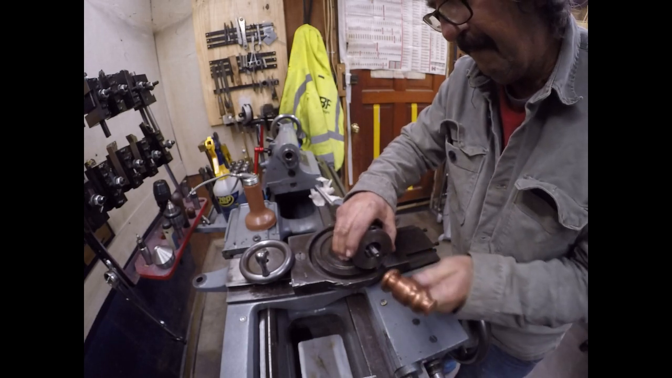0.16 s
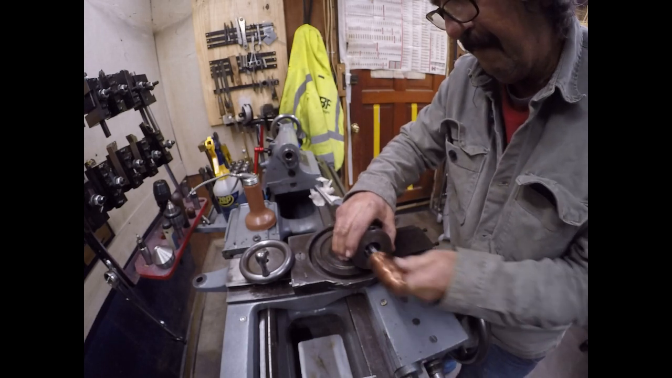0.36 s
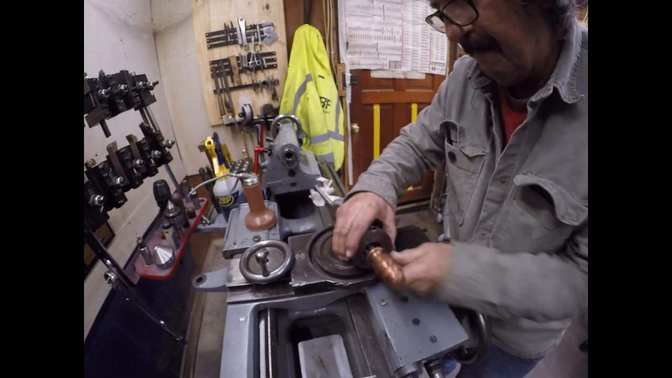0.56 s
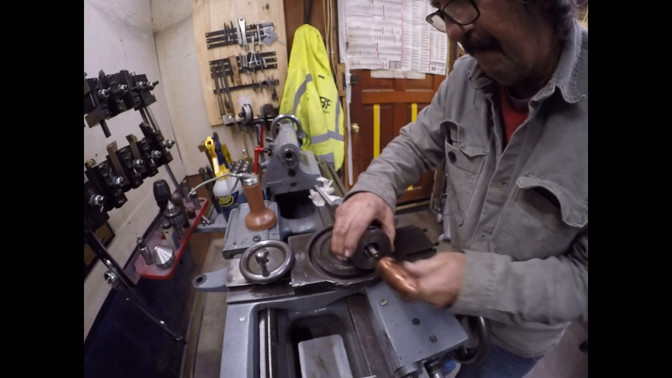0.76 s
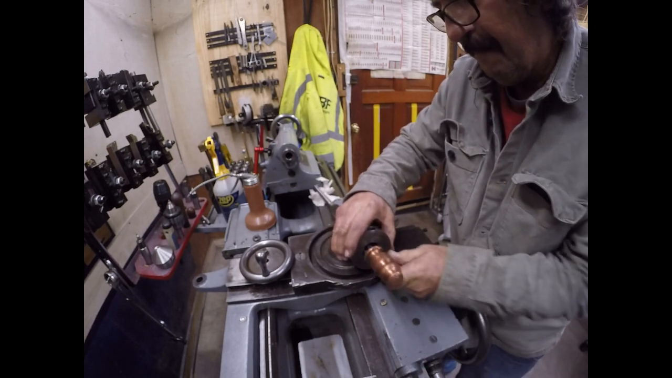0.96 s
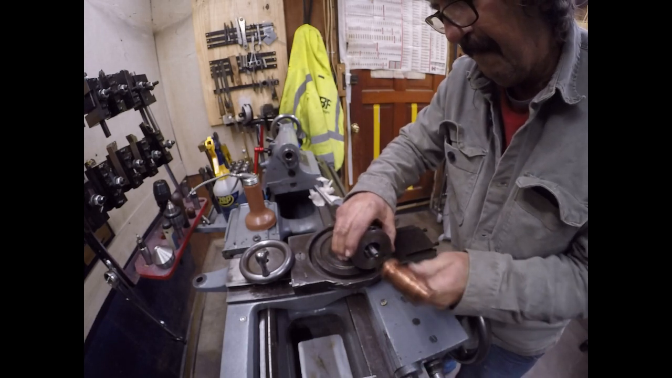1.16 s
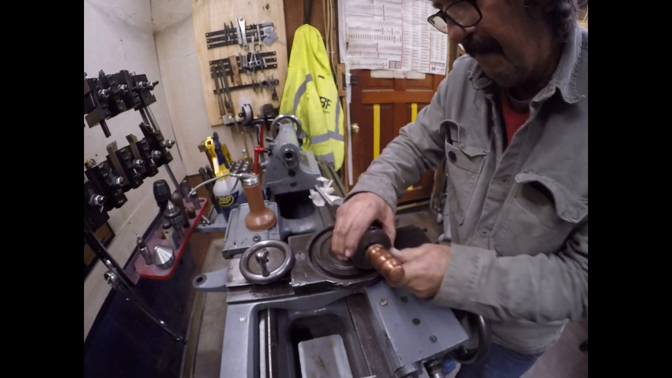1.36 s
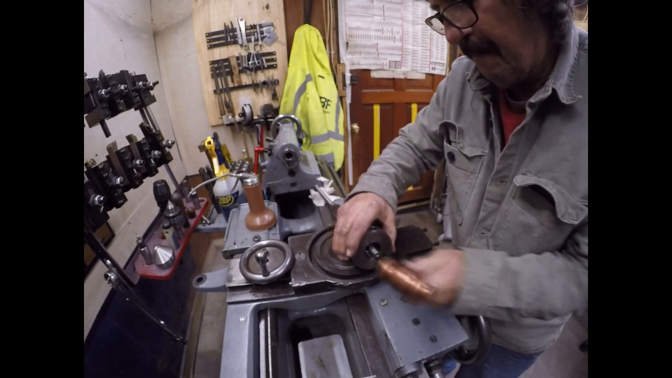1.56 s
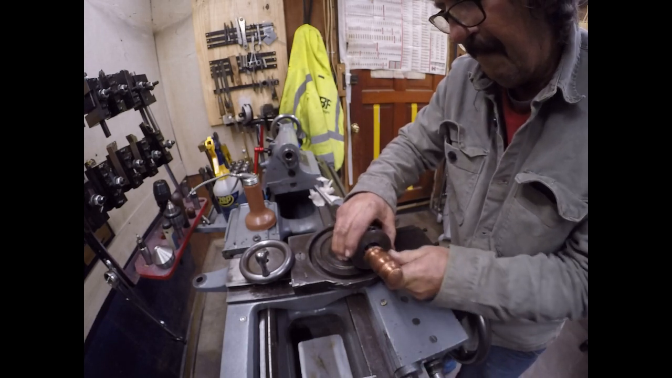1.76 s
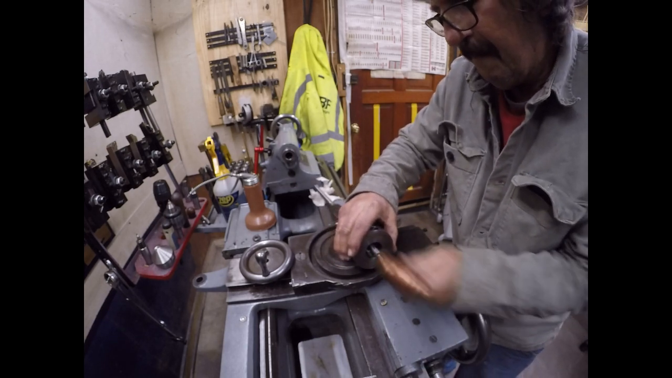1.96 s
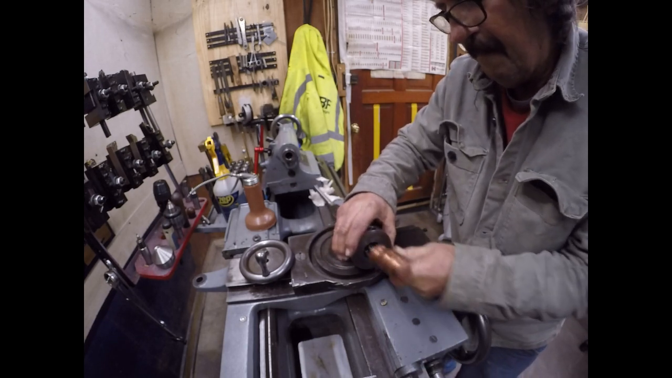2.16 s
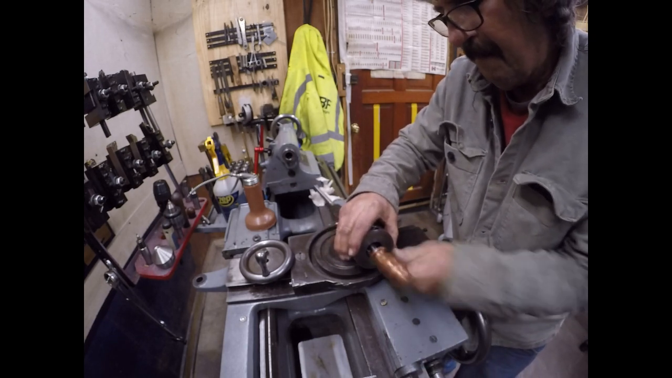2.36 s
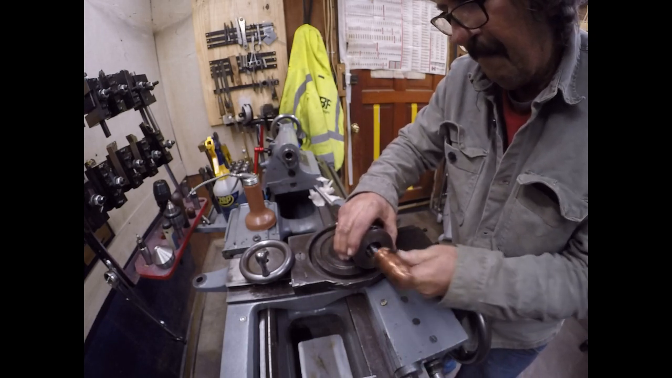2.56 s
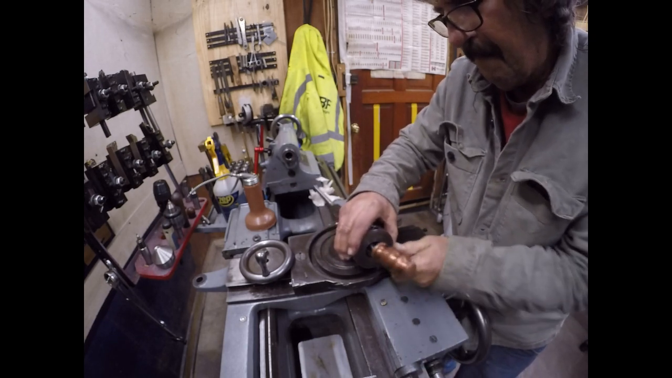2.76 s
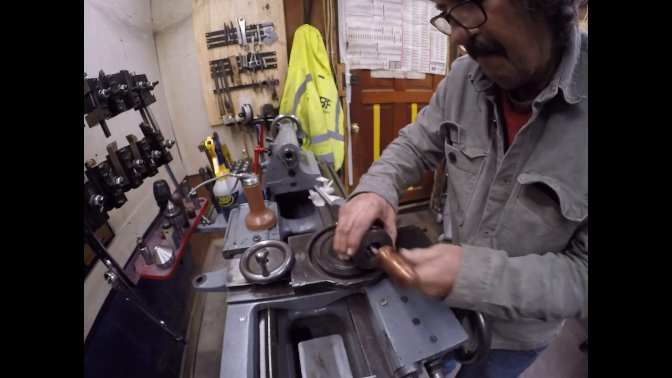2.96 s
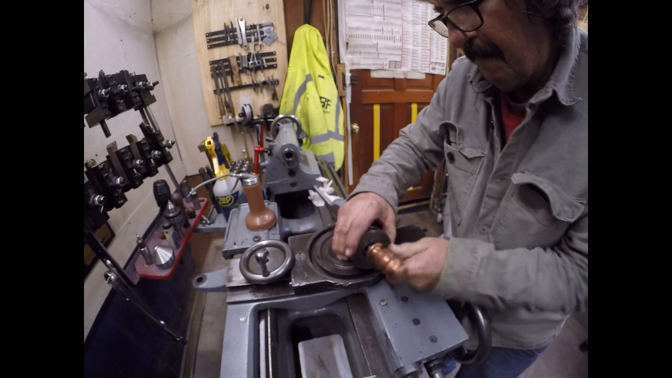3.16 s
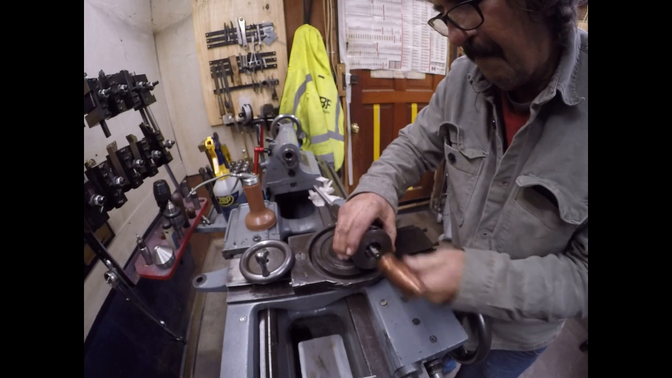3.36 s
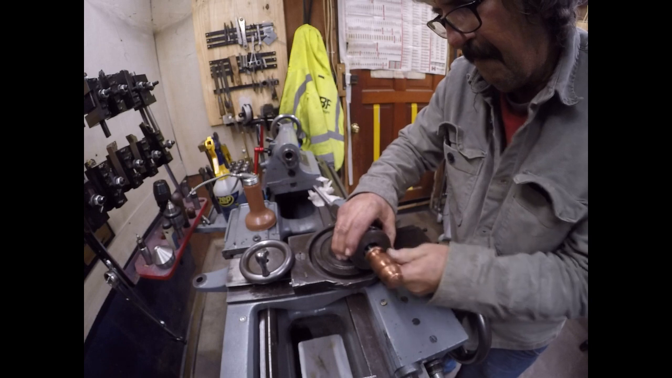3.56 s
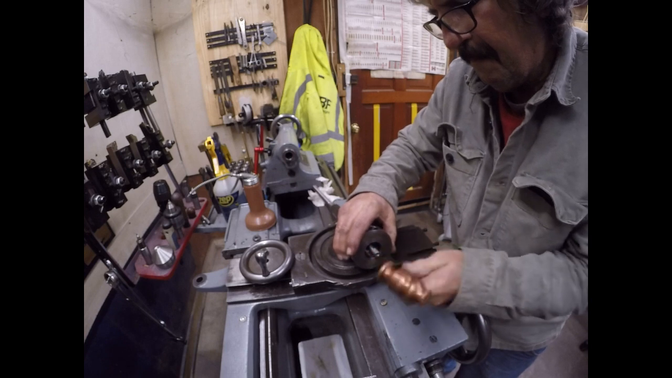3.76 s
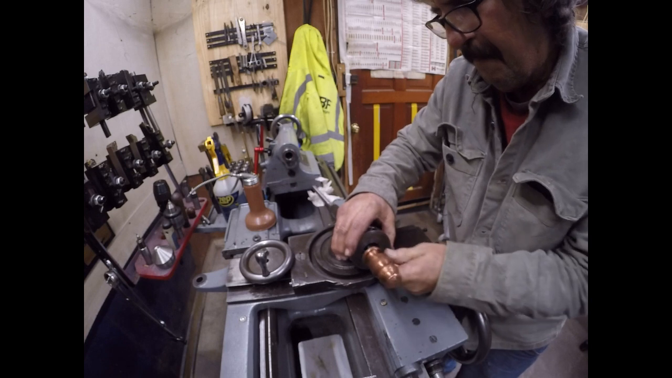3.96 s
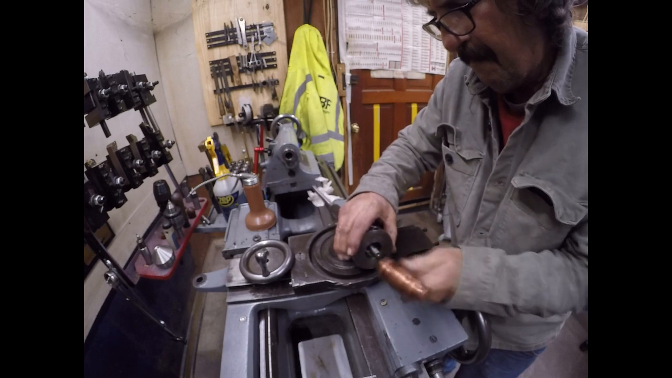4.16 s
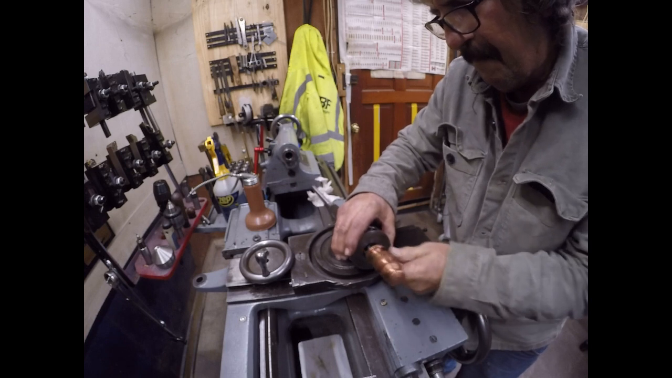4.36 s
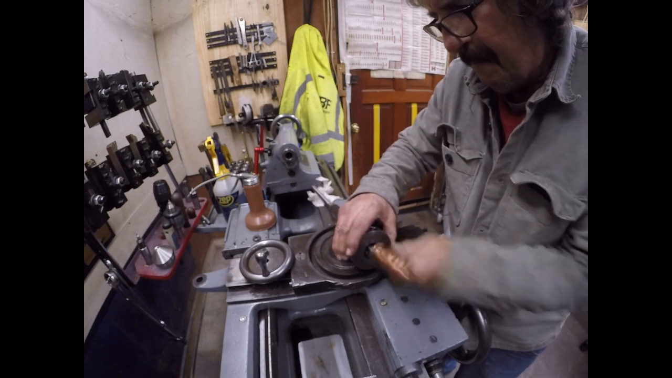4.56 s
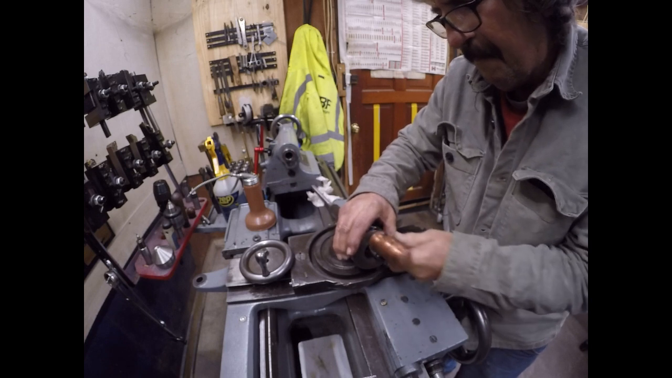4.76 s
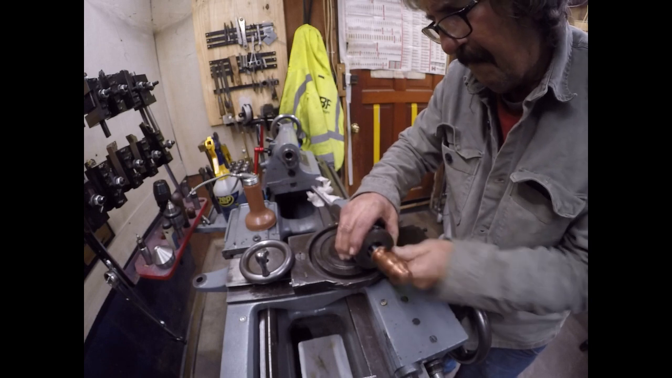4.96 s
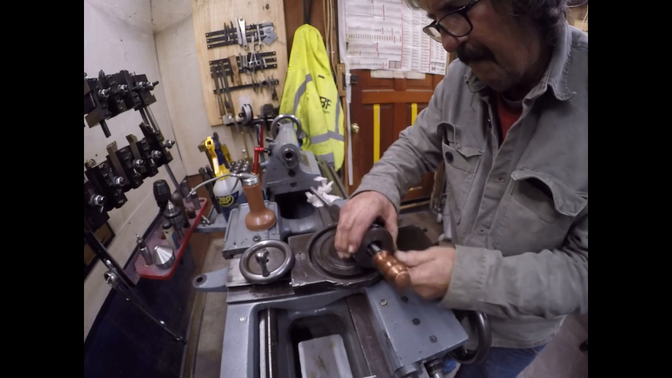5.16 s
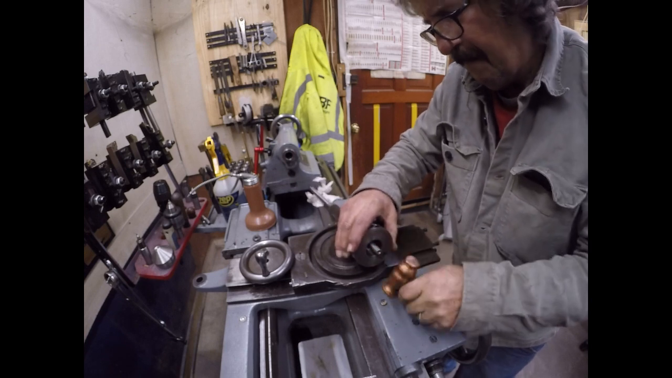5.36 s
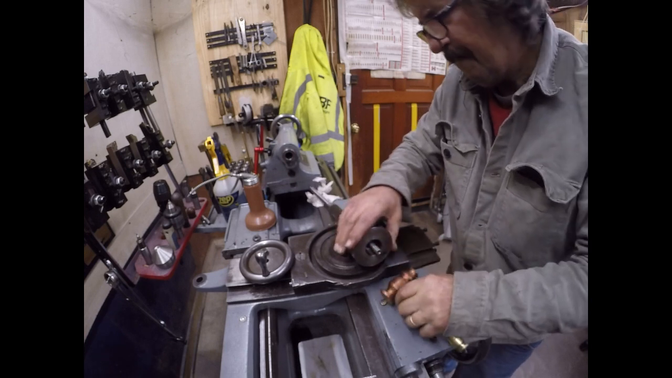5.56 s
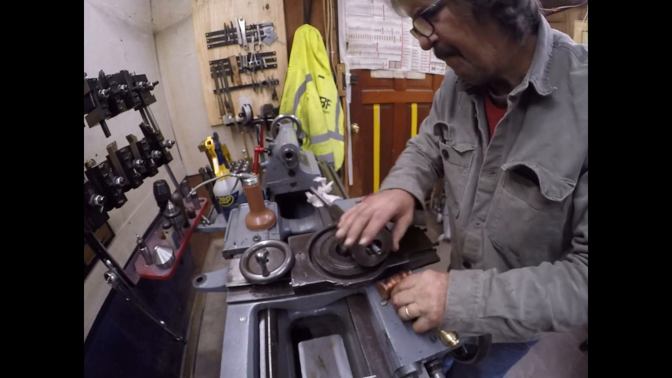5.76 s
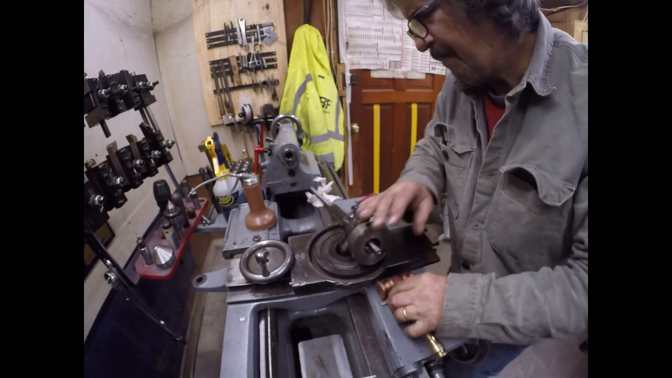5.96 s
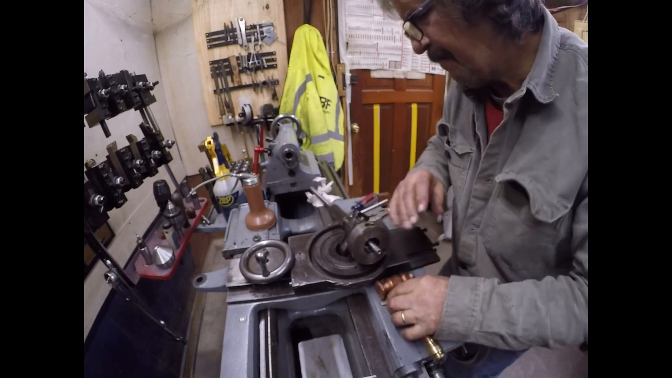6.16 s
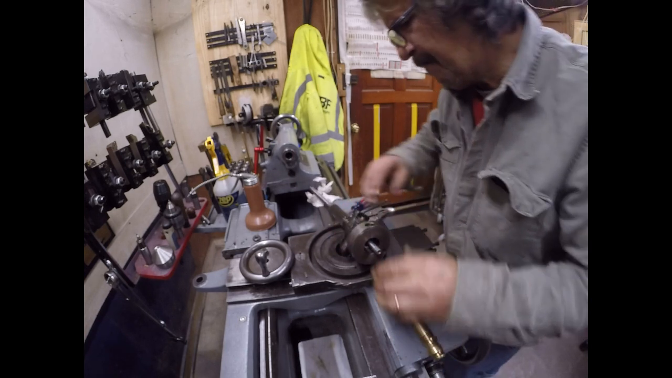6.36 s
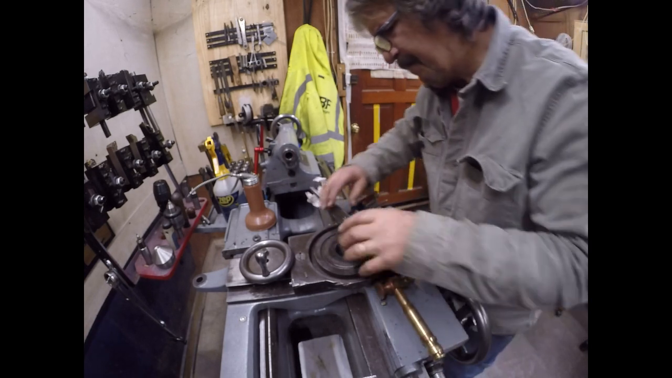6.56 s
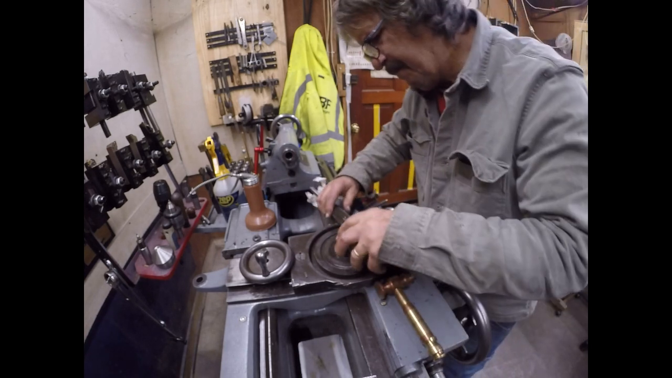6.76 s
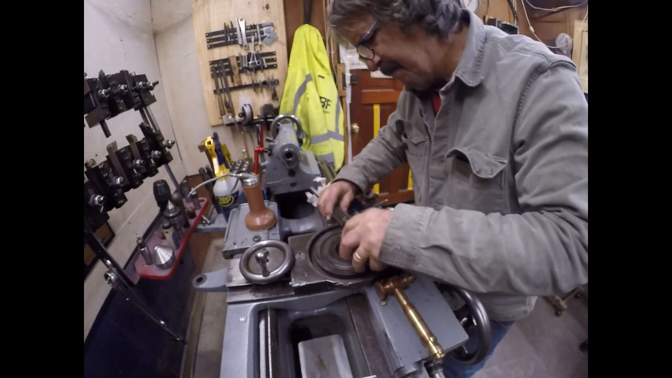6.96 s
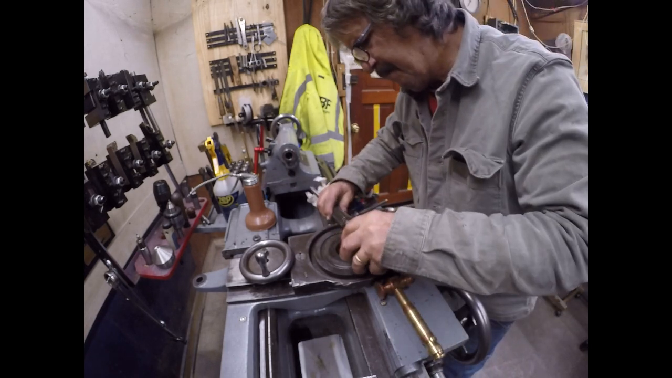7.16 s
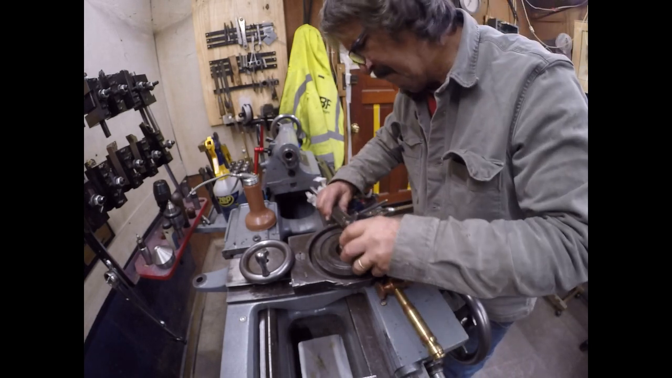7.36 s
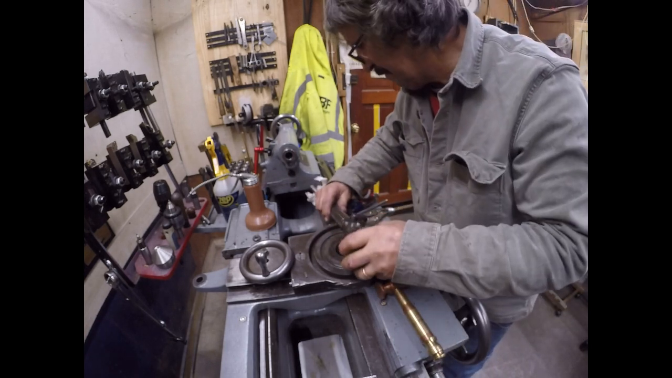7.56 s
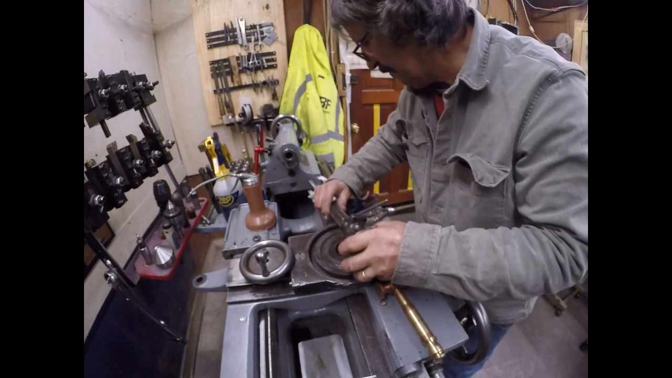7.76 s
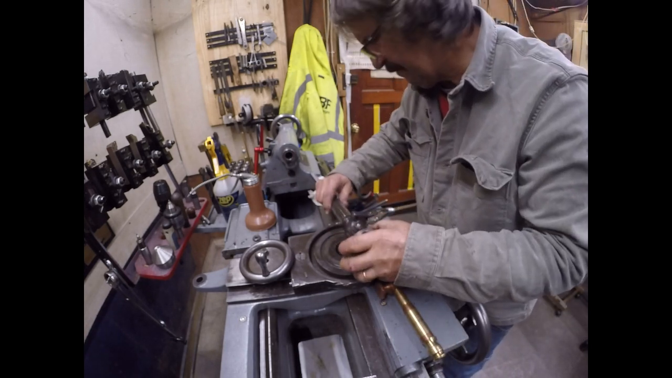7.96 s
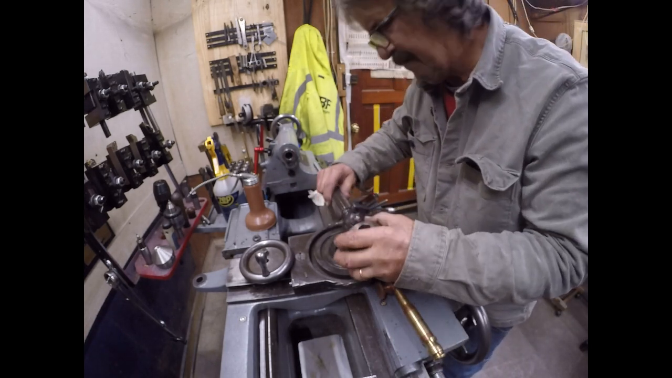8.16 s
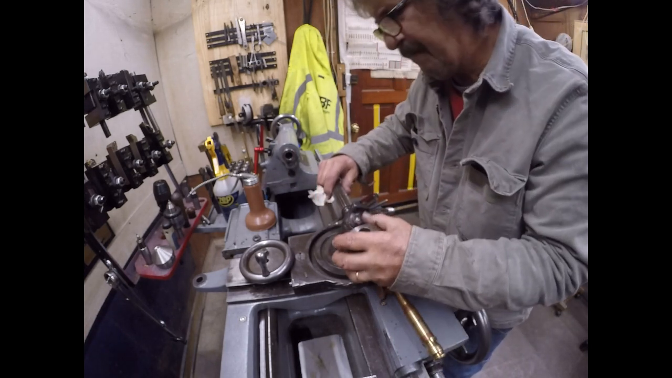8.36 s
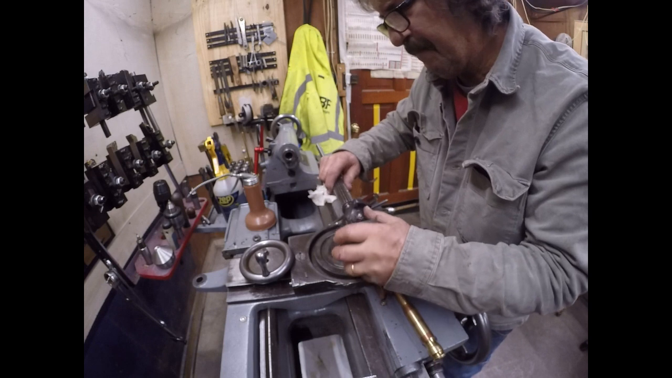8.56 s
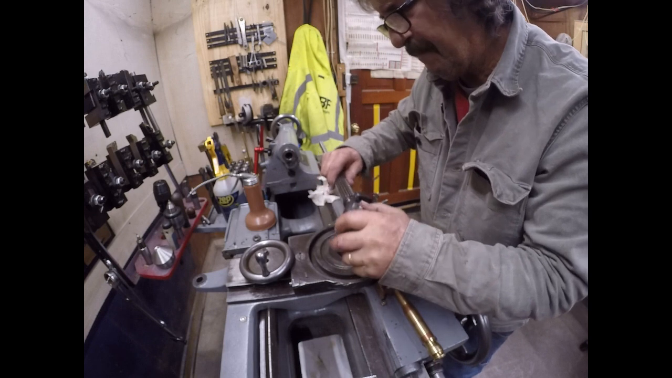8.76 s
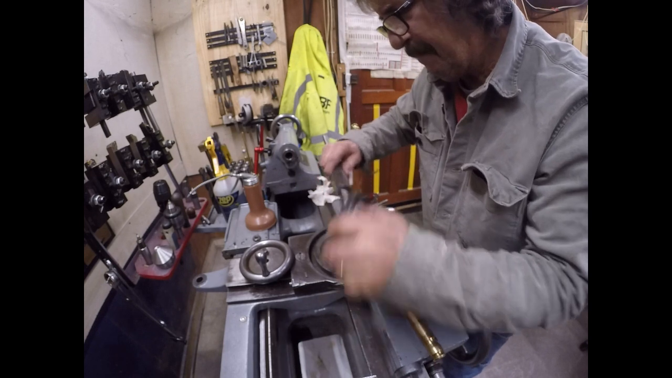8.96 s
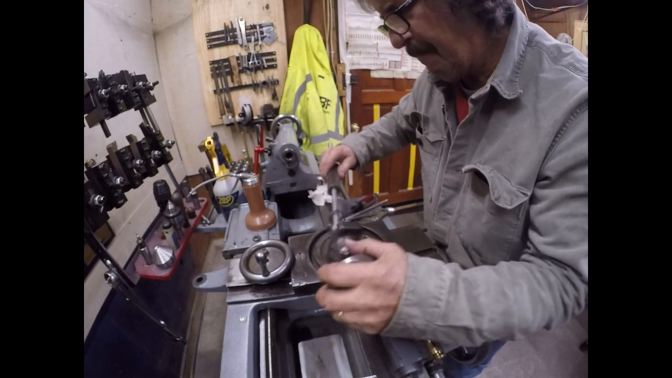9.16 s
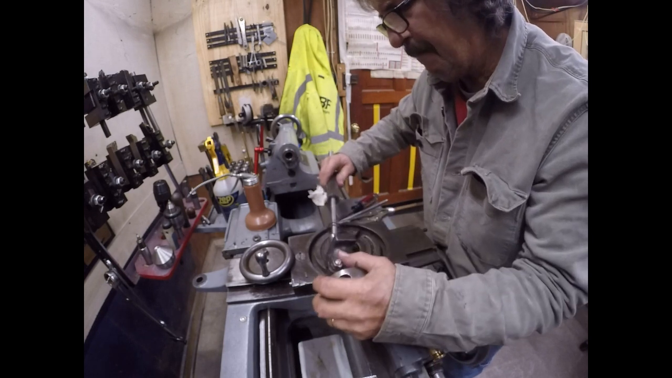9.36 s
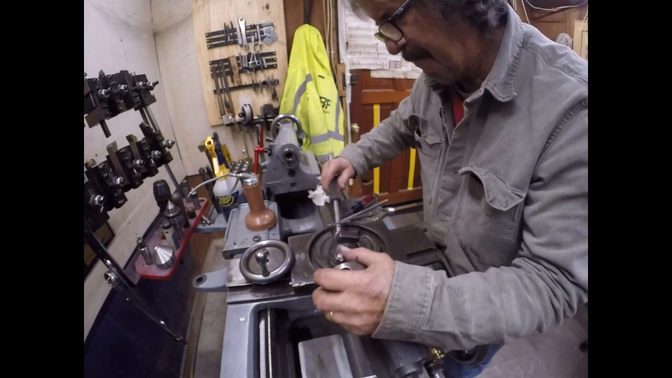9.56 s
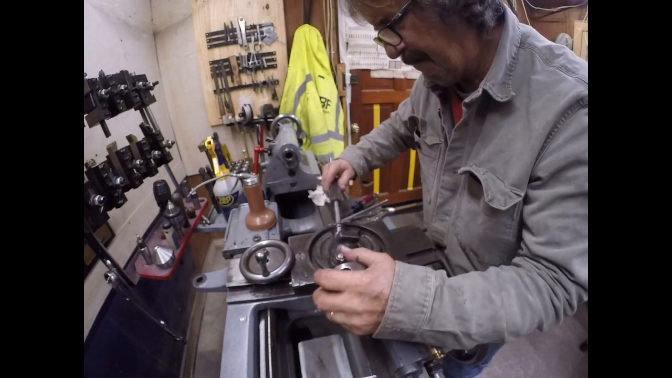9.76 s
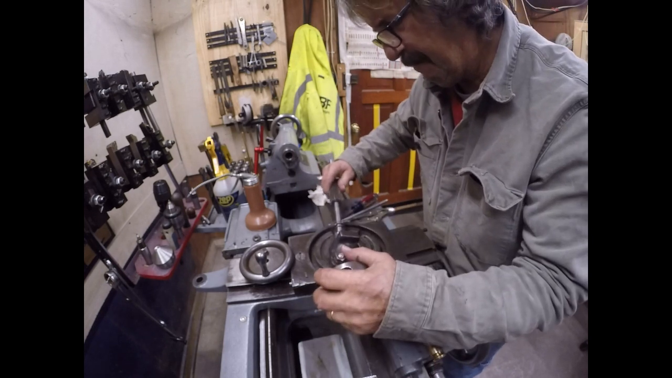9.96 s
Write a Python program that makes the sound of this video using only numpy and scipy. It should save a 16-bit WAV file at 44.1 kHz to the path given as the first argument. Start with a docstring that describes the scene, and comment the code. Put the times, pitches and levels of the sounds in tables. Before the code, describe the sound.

A copper hammer taps a hand-held steel part on a heavy machine bed, about three times a second, each blow a short, sharp clack that slightly overloads the close microphone. After five seconds the tapping stops and the hammer is set down with a clunk. Steel parts are slid, knocked and dropped into place, ending in a brighter clatter. The small workshop has a faint rumble and a barely audible distant engine.

```python
"""Copper hammer on a machine bed

Fifteen even taps seat a hand-held steel part in a small workshop. The hand damps the part, so each
tap is a short clack that rings bed and room and overloads the microphone. The hammer is laid down;
steel parts are shifted, scraped and dropped into place. A distant engine drones behind."""
import sys
import numpy as np
from scipy import signal
from scipy.fft import rfft, irfft
from scipy.io import wavfile
from scipy.ndimage import uniform_filter1d

SR = 44100
rng = np.random.default_rng(int(sys.argv[2]) if len(sys.argv) > 2 else 0)


def wav_record(signal):
    """Record a signal, one row per channel, as 16-bit PCM in the file named by sys.argv[1]."""
    frames = np.transpose(np.atleast_2d(signal))
    bounded = np.clip(frames, -1, 1)
    # unit amplitude maps onto the largest positive 16-bit level
    quanta = np.round(bounded * 32767).astype(np.int16)
    wavfile.write(sys.argv[1], SR, quanta)


N = 440986
LEAD = SR // 4  # pre-roll: tapping starts before time zero

# hammer blows (time [s], level [dB], tilt [dB/oct], part ring [dB]); looser grip, more ring
HAMMER_BLOWS = [(-0.018, -1, 0.5, -1.5), (0.3197, -0.5, 0.34, -2), (0.6375, -0.5, 0.46, -0.5),
                (0.977, -0.75, 0, 1), (1.33, -0.34, -0.46, 2), (1.6908, -0.5, 0.2, 0),
                (2.0755, -0.5, -0.04, -1), (2.4485, -0.5, -0.03, -2.5), (2.8219, -0.2, 0.17, 0.5),
                (3.177, 1, -0.64, -3.5), (3.5458, 0.6, 0, 0), (3.912, -1.06, -0.1, 2),
                (4.2923, -1, -0.26, 1.5), (4.6517, 0.14, -0.16, 0), (5.0453, -0.1, -0.5, 1)]
# copper-on-steel crack (frequency [Hz], gain [dB])
CRACK_SPECTRUM = [(40, 7), (120, 9.5), (260, 8), (500, 17), (850, 25.5), (1200, 23.5), (1800, 23.5),
                  (3100, 27.5), (4300, 23), (7200, 21), (8300, 12), (10300, 16.5), (12500, 6.5), (15500, 6)]
# hand-damped part (frequency [Hz], level [dB], t60 [s])
PART_MODES = [(793, -15.5, .055), (966, -23, 0.054), (1470, -24.5, 0.16), (2184, -16, 0.078),
              (2450, -26, 0.05), (2560, -22.5, .06), (3250, -15.5, .055), (3350, -23, 0.15),
              (3834, -26, 0.19), (4950, -27.5, 0.12), (7440, -20, .06), (7750, -25.5, .07),
              (11550, -34, 0.14), (13400, -24.5, 0.029)]
# cast bed and trays (frequency [Hz], level [dB], t60 [s])
BED_MODES = [(37.77, -46, 0.96), (57, -38, .7), (92, -32, 0.29), (149, -36, 0.42), (154, -36, 0.097),
             (217.3, -36.5, .42), (257, -35, 0.45), (355, -25, 0.27), (461, -31, 0.37), (657, -32, .3),
             (773, -33, 0.08), (1240, -34, 0.35)]
# parts and hammer on the bed (time [s], level [dB], tilt [dB/oct], crack t60 [s], spot note [Hz])
BED_KNOCKS = [(4.226, -20.5, -7.5, 0.038, 3900), (4.752, 5, -0.8, .022, 1900),
              (4.795, -7.5, 3, 0.022, 6060), (4.836, -10, -1.5, 0.036, 3400), (5.6186, 3.5, -3, 0.03, 726),
              (5.678, -15, -9, .11, 1490), (5.732, 9.5, -3.5, 0.084, 1580), (6.006, 6, 0.5, 0.028, 3260),
              (6.092, 1, -2.5, 0.037, 1385), (7.028, -13.5, -2.5, 0.045, 1400),
              (7.079, 9.5, -2.5, 0.093, 4390), (7.704, -21.5, 3, 0.034, 3300), (8.253, -22, 6, .038, 3130),
              (8.993, -17, 2, 0.04, 3100), (9.015, -16.5, 2, 0.073, 1350), (9.06, -3, 4.5, 0.085, 4330),
              (9.153, -1, 5, 0.1, 1280), (9.1903, 5.5, 3, 0.029, 5600), (9.1978, 6.5, 7.5, 0.055, 1190),
              (9.338, -35, 8, .04, 6500), (9.3875, -21, 6.5, 0.018, 14500), (9.49, -1, -4, 0.1, 412),
              (9.556, -3.5, -5.5, 0.12, 1210), (9.5667, 3, -0.5, 0.17, 6330)]
# steel sliding on steel (start [s], end [s], level [dB], tilt [dB/oct], spot note [Hz])
STEEL_SLIDES = [(5.867, 6.066, -6.5, 2, 800), (5.994, 6.093, 3.5, 0.8, 1100), (6.407, 6.488, 3, 1, 2000),
                (6.471, 6.506, -3, -3, 915), (6.756, 6.8, -34.5, 11.5, 10500), (7.585, 7.72, -19, -6, 500),
                (7.656, 7.696, -17.5, -9, 750), (7.748, 7.947, -32, 0.5, 3510), (7.96, 8.077, -20, 2, 3500),
                (7.998, 8.093, -15.5, -4, 280), (9.045, 9.128, -6, 11.5, 3100),
                (9.086, 9.157, -1.5, 10, 3560)]
# steel-on-steel contact before tilt (frequency [Hz], gain [dB])
CONTACT_SPECTRUM = [(50, -14.5), (250, -11), (750, 5), (1700, 0), (3500, -0.5), (5500, -10.5), (11000, -25),
                    (16000, -34)]
# seated part (frequency [Hz], peak [dB], t60 [s])
SEATED_MODES = [(160, -0.5, 0.098), (247, 2, 0.092), (458, -2.5, .2), (946, -2, 0.15), (1470, 5.5, 0.09),
                (2720, -5, 0.034), (2970, -5.5, .06), (3695, -6, .06)]
# loose part, handled last (frequency [Hz], peak [dB], t60 [s])
LOOSE_MODES = [(257, 7, 0.073), (473, -1, 0.1), (634, 0.5, 0.075), (1204, -2.5, 0.04), (1390, 2, 0.02),
               (2509, -21, 0.21), (3040, 5.5, 0.018), (3600, -2, 0.072), (4450, 2, 0.075),
               (4820, 10.5, 0.17), (5740, 8.5, 0.018), (9240, 8.5, 0.017), (11460, -6, 0.018)]
# workshop decay (frequency [Hz], t60 [s])
ROOM_DECAY = [(100, 0.35), (400, 0.2849), (1000, 0.3163), (3000, 0.2634), (6000, 0.2566), (10000, 0.1371),
              (15000, 0.29)]
# workshop reverberation (frequency [Hz], level re direct [dB])
ROOM_SPECTRUM = [(60, 4), (200, 11), (500, 4.5), (1000, -8.5), (3000, -6), (6000, -9.5), (11000, -8),
                 (15000, -11.5)]
# engine cruise, then two gears (start [s], length [s], first pitch [Hz], last pitch [Hz], level [dB])
ENGINE_PULLS = [(2.799, 1.7, 94, 94.6, -51), (5.8, 1.02, 97, 112.4, -47), (6.954, 1.95, 95, 114.2, -48)]
# still room (frequency [Hz], relative density [dB])
FLOOR_SPECTRUM = [(12, -26.5), (24, -1), (45, 5), (65, 0), (100, -5.5), (150, -14), (240, -20), (600, -24),
                  (1100, -28.5), (1700, -29), (2300, -28.5), (3200, -29.5), (8500, -40.5), (15000, -45.5)]


def hammer(likeness=0.76, crack_t60_s=0.055, clang_send_db=-7, bed_rise_s=0.0035,
           thud_db=-26, thud_hz=185, thud_delay_s=0.014, thud_width_s=0.0035):
    """Each blow cracks and rings the part; the heavy bed follows with a thud and a ring."""
    direct, send = np.zeros((2, N + LEAD))
    same_spot = crack(crack_t60_s)
    for time_s, level_db, tilt_db_oct, ring_db in HAMMER_BLOWS:
        tone = tilted(level_db, tilt_db_oct, np.transpose(CRACK_SPECTRUM)[0])
        contact = likeness * same_spot + np.sqrt(1 - likeness ** 2) * crack(crack_t60_s)
        add(direct, time_s, colour(colour(contact, CRACK_SPECTRUM), tone))
        add(send, time_s, colour(colour(all_round(contact), CRACK_SPECTRUM), tone))
        clang = gain_of(ring_db) * colour(ring(PART_MODES, spread_db=3, size=8192), tone)
        add(direct, time_s, clang)
        add(send, time_s, gain_of(clang_send_db) * clang)
        boom = ring(BED_MODES, spread_db=1.2)
        t = np.arange(len(boom)) / SR
        boom *= 1 - np.exp(-t / bed_rise_s)
        pulse = np.exp(-((t - thud_delay_s) / thud_width_s) ** 2)
        thud = gain_of(thud_db) * pulse * np.sin(2 * np.pi * thud_hz * t)
        add(direct, time_s, gain_of(lookup(tone, thud_hz)) * (thud + boom))
    return np.array([direct, send])


def crack(t60_s, size=4096):
    """Dense, fast-dying vibration with a broadly flat spectrum."""
    burst = rng.standard_normal(size) * fade(np.arange(size) / SR, t60_s)
    power = uniform_filter1d(abs(rfft(burst)) ** 2, size=45)
    return min_phase(burst, 1 / np.sqrt(power + 1e-12))[:size]


def all_round(contact, uneven=0.4):
    """Summed over all directions, a crack reaches the walls with a smoother spectrum."""
    return np.sqrt(1 - uneven ** 2) * signal.unit_impulse(len(contact)) + uneven * contact


def ring(modes, spread_db, detune=0.004, size=24576):
    """Damped modes; pitch and strength vary with grip and striking point."""
    hz, db, t60_s = np.transpose(modes)[:, :, None]
    pitch, strength, side = rng.standard_normal((3, len(modes), 1))
    t = np.arange(size) / SR
    envelope = gain_of(db + spread_db * strength) * fade(t, t60_s)
    return (np.sign(side) * envelope * np.sin(2 * np.pi * hz * (1 + detune * pitch) * t)).sum(0)


def tilted(level_db, tilt_db_oct, hz, pivot_hz=1700):
    """Harder contacts are brighter: a sloped table (frequency [Hz], gain [dB])."""
    return np.c_[hz, level_db + tilt_db_oct * np.log2(np.clip(hz, 600, 11000) / pivot_hz)]


def knocks(note_db=4, note_cycles=38):
    """Short cracks ring the touched spot and the part."""
    direct, send = np.zeros((2, N + LEAD))
    for time_s, level_db, tilt_db_oct, t60_s, note_hz in BED_KNOCKS:
        contact = crack(t60_s)
        spot_mode = [(note_hz, note_db, note_cycles / note_hz)]
        for bus, drive in (direct, contact), (send, all_round(contact)):
            spot = resonate(drive, spot_mode)
            add(bus, time_s, handled_part(spot, time_s, level_db, tilt_db_oct, note_hz))
    return np.array([direct, send])


def slides(grain_db=2.0, catches_per_s=1100, hiss_db=-3, chatter_db=3, chatter_hz=90):
    """Rough faces catch and release in clumps, ringing the part."""
    out = np.zeros(N + LEAD)
    hits = rng.random(N) < catches_per_s / SR
    catches = hits * gain_of(grain_db * np.minimum(rng.exponential(1, N), 3))
    grit = evened(catches * rng.choice([-1, 1], N)) + gain_of(hiss_db) * rng.standard_normal(N)
    grit *= gain_of(chatter_db * drift(chatter_hz))
    for start_s, end_s, level_db, tilt_db_oct, note_hz in STEEL_SLIDES:
        stroke = grit[round(start_s * SR):][:round((end_s - start_s) * SR)]
        stroke = stroke * signal.windows.tukey(len(stroke), 0.7)
        stroke /= np.linalg.norm(stroke)
        add(out, start_s, handled_part(stroke, start_s, level_db, tilt_db_oct, note_hz))
    return np.array([out, out])


def handled_part(drive, time_s, level_db, tilt_db_oct, note_hz, loose_from_s=8.6, lift_db=4,
                 width_oct=0.45):
    """A contact rings the part in hand; hardness tilts it, the spot lifts the band at its note."""
    hz = np.geomspace(40, 16000, 120)
    spot_db = lift_db * np.exp(-(np.log2(hz / note_hz) / width_oct) ** 2)
    rung = resonate(drive, SEATED_MODES if time_s < loose_from_s else LOOSE_MODES)
    return colour(rung, tilted(level_db + lookup(CONTACT_SPECTRUM, hz) + spot_db, tilt_db_oct, hz))


def resonate(drive, modes, size=12000):
    """Drive plus the ring of its modes (frequency [Hz], peak [dB], t60 [s])."""
    hz, db, t60_s = np.transpose(modes)[:, :, None]
    t = np.arange(size) / SR
    decay = fade(t, t60_s)
    decay /= decay.sum(1, keepdims=True)
    body = (2 * gain_of(db) * decay * np.cos(2 * np.pi * hz * t)).sum(0)
    body[0] += 1
    return signal.fftconvolve(drive, body)


def workshop(send, sway_hz=0.37):
    """Some reflections stay put; others shift as the worker moves."""
    sway = 2 * np.pi * sway_hz * np.arange(len(send)) / SR
    feeds = [np.ones(len(send)), np.cos(sway), np.sin(sway), np.cos(2 * sway), np.sin(2 * sway)]
    reflections = sum(signal.oaconvolve(send * feed, room_tail())[:len(send)] for feed in feeds)
    return reflections / np.sqrt(np.sum(np.square(feeds), 0))


def room_tail(first_echo_s=0.004, build_s=0.011, echoes_per_s=5000, size=32768):
    """Close walls and machines: a dense, short tail, dying fastest near 10 kHz."""
    t = np.arange(size) / SR
    echoes = rng.standard_normal(size) * (rng.random(size) < echoes_per_s / SR)
    echoes *= np.clip((t - first_echo_s) / build_s, 0, 1)
    hz, frame_s, bands = signal.stft(echoes, SR, nperseg=256)
    bands *= fade(frame_s, lookup(ROOM_DECAY, hz)[:, None])
    tail = signal.istft(bands, SR, nperseg=256)[1][:size]
    power = uniform_filter1d(abs(rfft(tail)) ** 2, size=100)
    gain = gain_of(lookup(ROOM_SPECTRUM, np.fft.rfftfreq(size, 1 / SR)))
    return min_phase(tail, gain / np.sqrt(power + 1e-16))


def engine(ramp_s=0.3, fade_db=-12.5, rev_curve=2.1, waver=0.4, waver_hz=7):
    """Distant exhaust note, wavering through the walls; each pull swells, then fades as revs climb."""
    out = np.zeros(N + LEAD)
    for start_s, length_s, first_hz, last_hz, level_db in ENGINE_PULLS:
        t = np.arange(0, length_s, 1 / SR)
        revs = (t / length_s) ** rev_curve
        ramp = np.minimum(np.minimum(t, length_s - t) / ramp_s, 1)
        phase = 2 * np.pi * np.cumsum(first_hz + (last_hz - first_hz) * revs) / SR
        add(out, start_s, np.sqrt(2) * ramp * gain_of(level_db + fade_db * revs) * np.sin(phase))
    return out[LEAD:] * (1 + waver * drift(waver_hz))


def background(floor_db=-49.5, whine_db=-80, whine_hz=10520, width_hz=170, throb_hz=30):
    """Rumble, hiss and a faint throbbing electronic whine."""
    t, hz = np.arange(N) / SR, np.fft.rfftfreq(N, 1 / SR)
    floor = noise(gain_of(lookup(FLOOR_SPECTRUM, hz)))
    throb = (1 + np.sin(2 * np.pi * throb_hz * t)) ** 2
    whine = throb * noise(np.exp(-((hz - whine_hz) / width_hz) ** 2))
    return gain_of(floor_db) * floor + gain_of(whine_db) * evened(whine)


def noise(gain):
    """Shaped steady noise, rms 1."""
    return evened(irfft(rfft(rng.standard_normal(N)) * gain, N))


def drift(width_hz):
    """Slow random motion, rms 1."""
    return noise(np.exp(-(np.fft.rfftfreq(N, 1 / SR) / width_hz) ** 2))


def colour(x, table, size=4096):
    """Filter by a table (frequency [Hz], gain [dB])."""
    return min_phase(x, gain_of(lookup(table, np.fft.rfftfreq(size, 1 / SR))))


def min_phase(x, gain):
    """Minimum-phase filter: no smear ahead of the attack."""
    log_gain = np.log(np.maximum(np.r_[gain, gain[-2:0:-1]], 1e-6))
    taps = np.fft.ifft(np.exp(np.conj(signal.hilbert(log_gain)))).real
    return signal.fftconvolve(x, taps[:len(gain)])


def lookup(table, hz):
    """Interpolate on a log-frequency axis."""
    table_hz, value = np.transpose(table)
    return np.interp(np.log(hz + 1), np.log(table_hz + 1), value)


def add(mix, time_s, sound):
    """Mix in a sound at time_s."""
    span = mix[LEAD + round(time_s * SR):][:len(sound)]
    span += sound[:len(span)]


def fade(t, t60_s):
    """Exponential decay, -60 dB at t60_s."""
    return np.exp(-np.log(1000) * t / t60_s)


def gain_of(db):
    """Decibels to amplitude."""
    return 10 ** (np.asarray(db) / 20)


def evened(x):
    """Scale to rms 1."""
    return x / np.sqrt(np.mean(x ** 2) + 1e-20)


def scene(handling_db=-2):
    """Blows and handling, direct and via the room, over engine and background; mono."""
    direct, send = hammer() + gain_of(handling_db) * (knocks() + slides())
    work = (direct + workshop(send))[LEAD:]
    return (work + engine() + background())[None]


def record(dry, ceiling=1.0, cutoff_hz=15350):
    """Microphone overload flattens the peaks; then a low-pass."""
    squashed = dry / (1 + (dry / ceiling) ** 4) ** (1 / 4)
    lowpass = signal.firwin(401, cutoff_hz, window=("kaiser", 8), fs=SR)
    return signal.oaconvolve(squashed, lowpass[None], "same")


dry = scene()
out = record(dry)
wav_record(out)
```